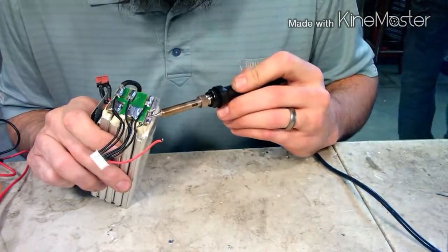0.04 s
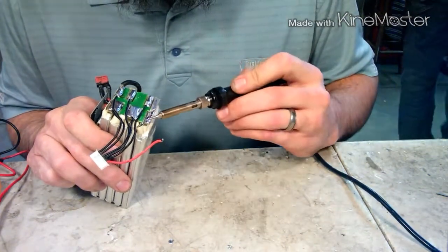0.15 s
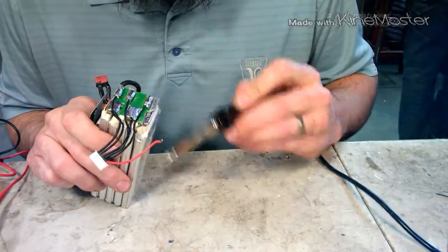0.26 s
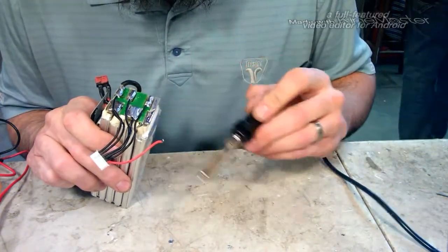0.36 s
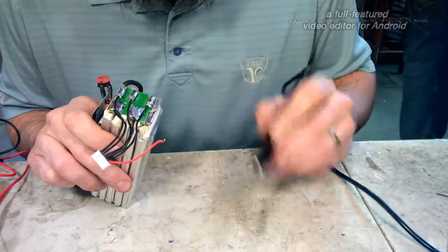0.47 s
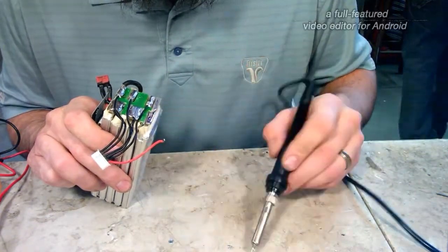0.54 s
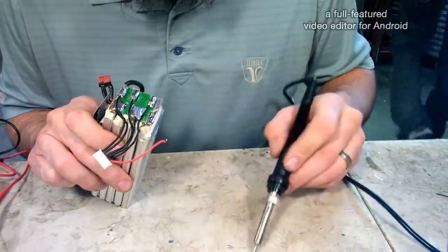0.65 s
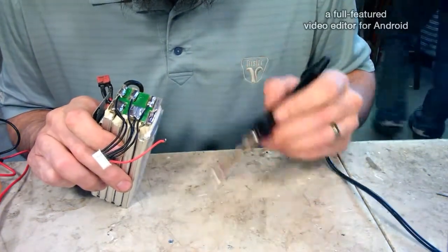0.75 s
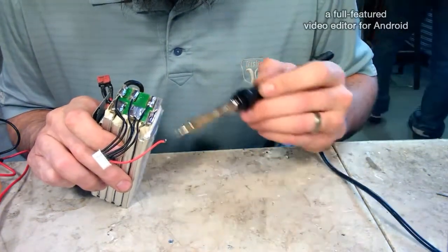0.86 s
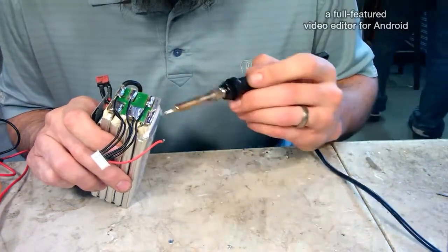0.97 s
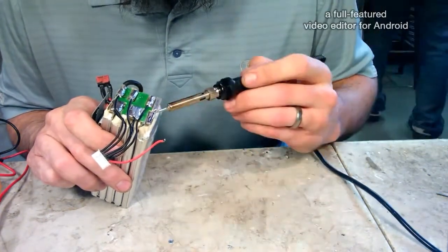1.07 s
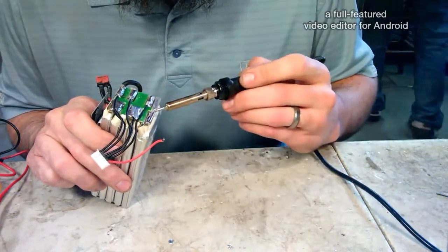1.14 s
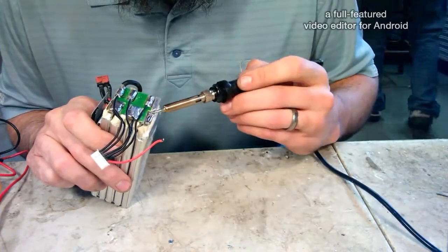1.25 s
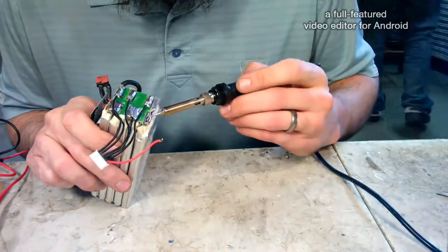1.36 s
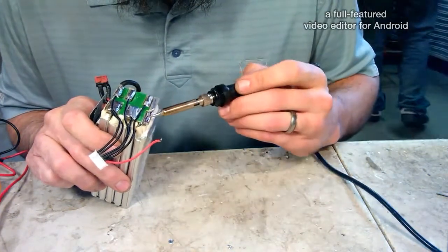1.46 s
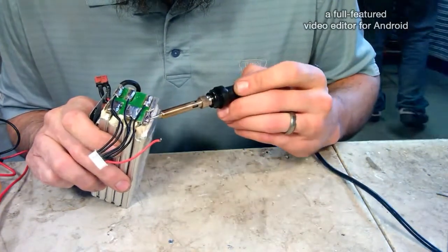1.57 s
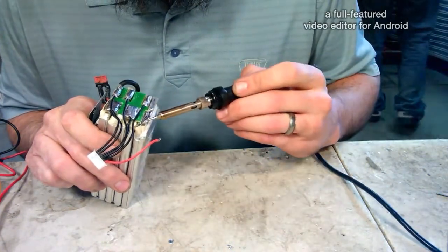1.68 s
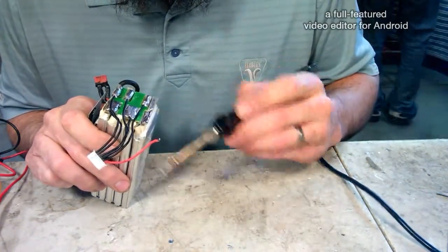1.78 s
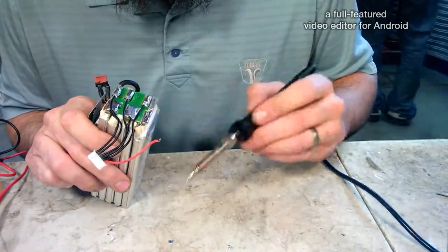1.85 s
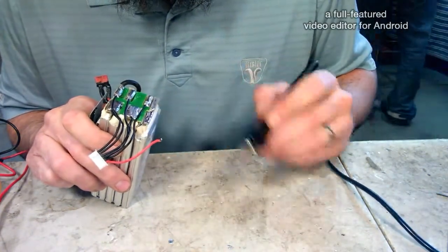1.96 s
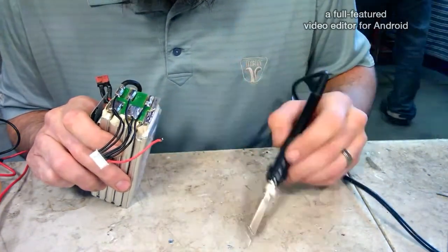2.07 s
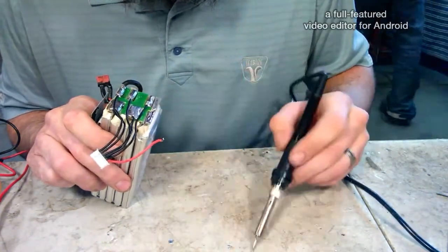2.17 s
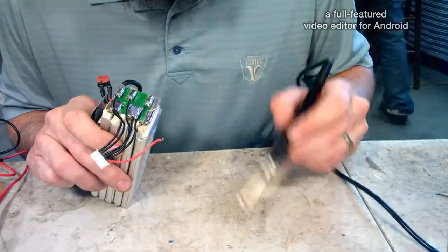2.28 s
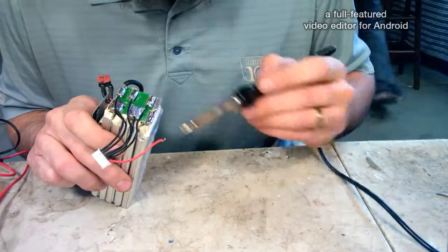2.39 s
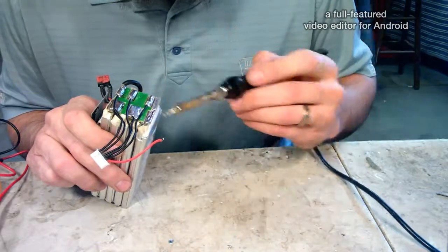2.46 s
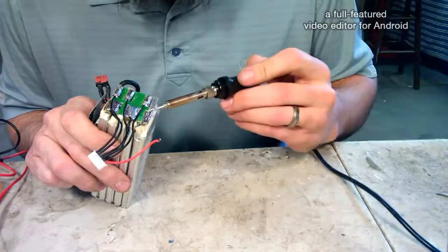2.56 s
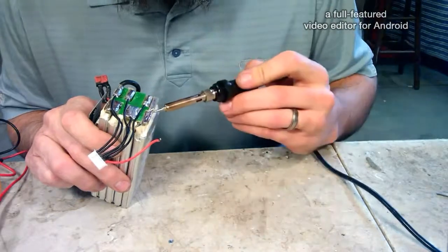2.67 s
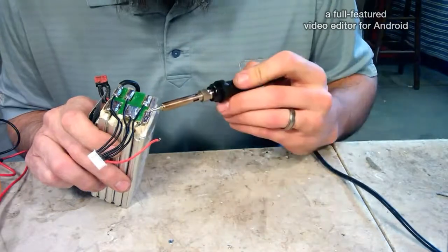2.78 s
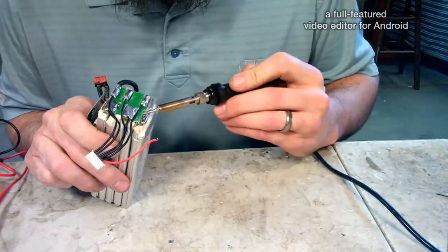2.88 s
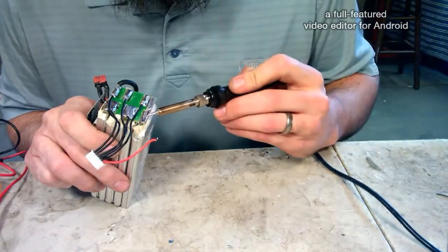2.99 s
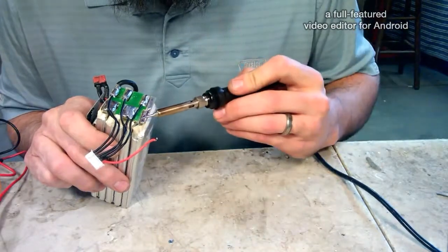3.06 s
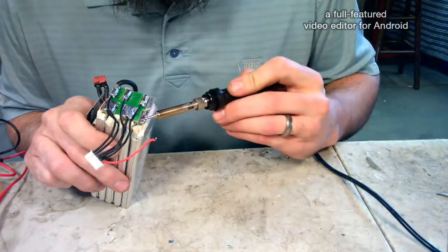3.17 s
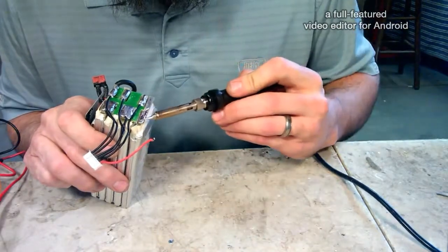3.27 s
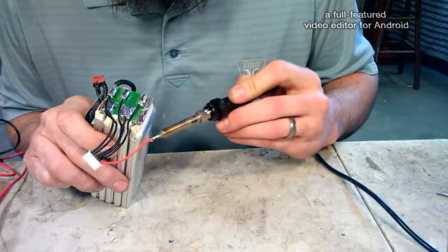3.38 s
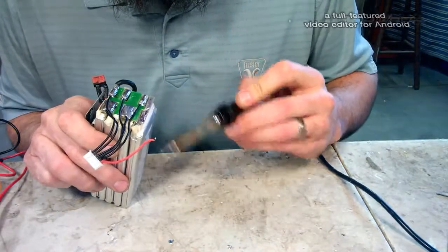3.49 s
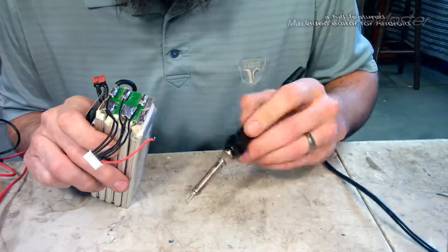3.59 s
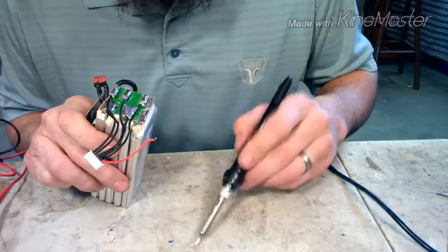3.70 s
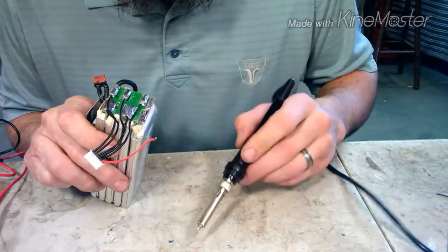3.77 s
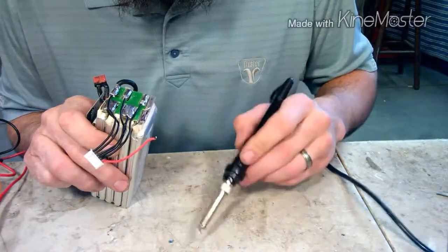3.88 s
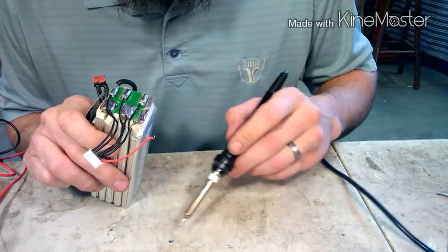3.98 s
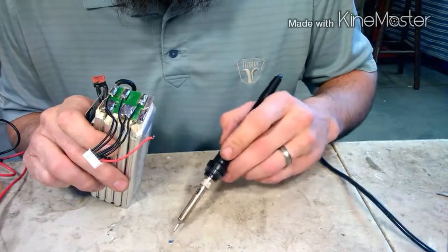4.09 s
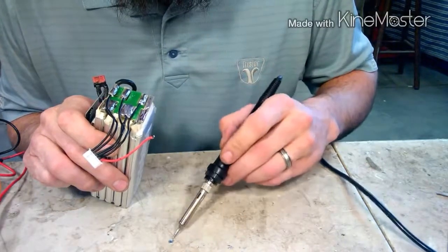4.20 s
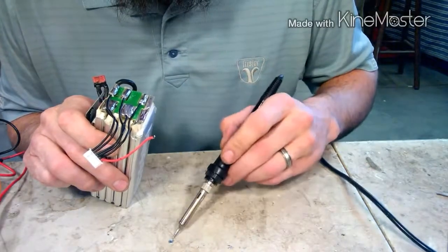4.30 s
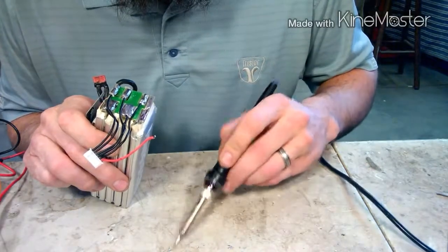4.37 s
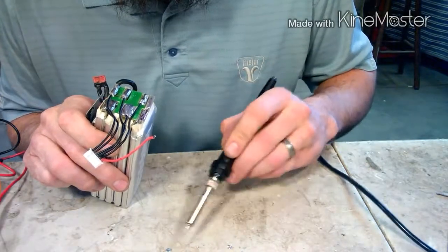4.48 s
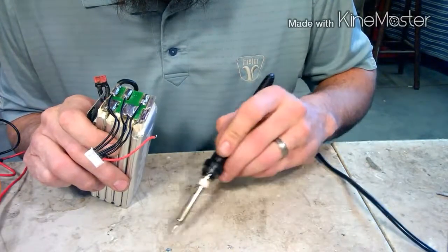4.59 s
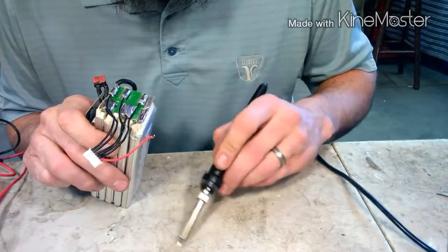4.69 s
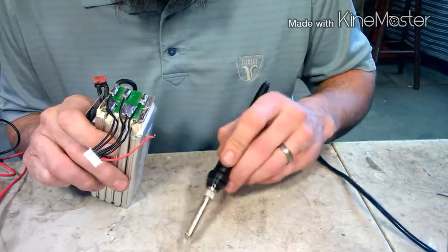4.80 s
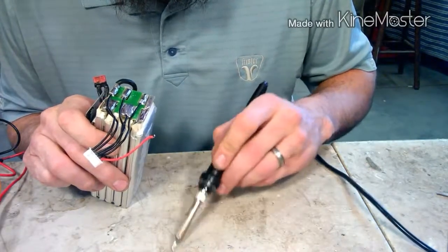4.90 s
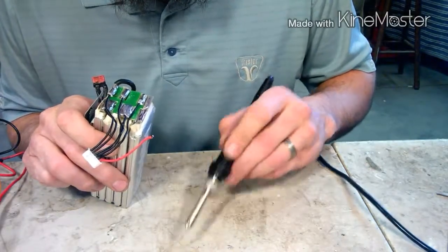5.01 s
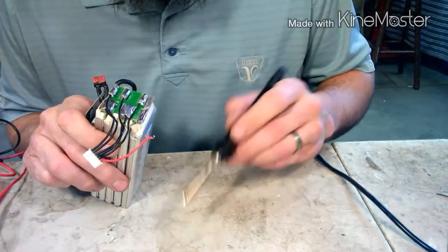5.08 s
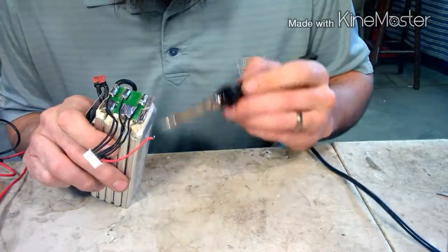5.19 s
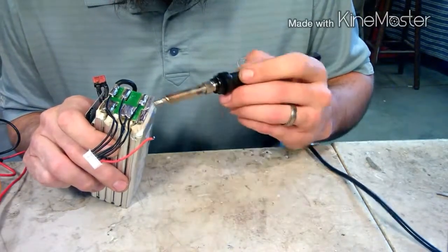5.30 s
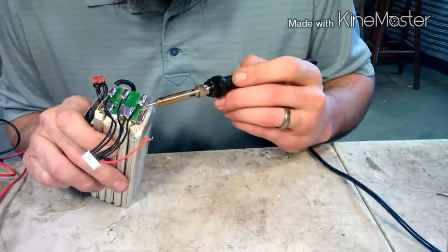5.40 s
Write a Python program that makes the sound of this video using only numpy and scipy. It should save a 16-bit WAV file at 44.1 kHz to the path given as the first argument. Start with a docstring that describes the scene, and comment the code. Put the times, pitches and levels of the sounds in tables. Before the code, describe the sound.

Hard dull knocks of a soldering iron on a workbench in three bursts, then faint taps and scrapes, over steady rumbling ventilation hiss.

```python
"""Soldering iron rapped on a workbench

A soldering iron is rapped on a workbench in three short bursts to shake off solder, then its tip is dabbed
and dragged on the top. Damped modes of the bench give dull knocks, filtered noise a crunch, and modes of the
steel barrel a tick; a drag is a run of small contacts. Filtered noise makes the ventilation rumble, hiss and
drone throughout; the camera's gain control ducks the sound after each hard rap and lets it swell back."""
import sys
import numpy as np
from scipy import signal
from scipy.fft import rfft, irfft, next_fast_len
from scipy.io import wavfile
from scipy.ndimage import uniform_filter1d, minimum_filter1d, map_coordinates

SR = 44100
rng = np.random.default_rng(int(sys.argv[2]) if len(sys.argv) > 2 else 0)


def materialize(psi):
    """Save the field psi as 16-bit PCM at rate SR to the path in sys.argv[1].

    A 1-D psi becomes a single channel; in a 2-D psi each row is a channel.
    """
    bounded = np.clip(np.atleast_2d(psi).T, -1, 1)
    quanta = np.round(bounded * 32767).astype(np.int16)
    wavfile.write(sys.argv[1], SR, quanta)


N = 240256

# Spectral density of the rushing air: (frequency [Hz], relative level [dB per Hz])
AIR_SPECTRUM = [(20, -15), (45, -14), (85, 1.5), (175, -1), (260, -4), (320, -2), (400, -7.5), (510, -8),
                (650, -12.5), (880, -12), (1200, -19), (2300, -26.5), (2620, -24), (3100, -27),
                (7000, -33.5), (15000, -45)]
# Level difference of the air, left over right: (frequency [Hz], difference [dB])
AIR_BALANCE = [(60, -10), (99, -5.5), (160, -6), (270, -12), (450, -1), (740, -5), (1210, -2), (2010, 0),
               (2450, -0.5), (2800, -2), (3310, -1), (5470, -0.5), (9030, -8.5), (14900, -9)]
# Correlation of the two sides before the lag and the notch: (frequency [Hz], correlation [0 to 1])
AIR_CORRELATION = [(40, 0.28), (150, 0.58), (300, 0.17), (460, 0.34), (650, 0.52), (1350, 0.97),
                   (1850, 0.19), (2400, 0.95), (2850, 0.85), (3400, 0.7), (5300, 0.57), (8000, 0.69),
                   (14000, 0.25)]
# Lag of the left microphone behind the right: (frequency [Hz], lag [s])
LEFT_LAG = [(1400, 0), (2630, .00019), (3700, .00027), (5100, .000294), (7900, .000316), (13800, .000326)]
# Brief dip of the background just before the second burst of raps: (time [s], level [dB])
BACKGROUND_DIP = [(1.975, 1), (1.995, -4), (2.04, -2.5), (2.08, 2)]
# Drone of the duct, before that dip: (time [s], level [dB])
DRONE_CURVE = [(0, -37), (.5, -44.5), (.9, -43), (1.15, -35.5), (1.5, -34.5), (1.85, -36), (2.2, -48.5),
               (5.45, -39)]
# Decay of the room: (frequency [Hz], t60 [s])
ROOM_DECAY = [(150, 0.37), (1500, 0.19), (10000, 0.53)]
# Modes of the bench top, nominal: (frequency [Hz], relative level [dB], t60 [s])
BENCH_MODES = [(175, 1, 0.012), (435.4, 2.5, 0.071), (591.5, 4.5, 0.031), (776, -2, 0.044),
               (911, -4, 0.028), (1045, -11.5, 0.026), (1208, -11, 0.089), (1335, -14.5, 0.044),
               (1528, -9.5, 0.042), (2010, -16.5, 0.0056), (2970, -32, 0.023)]
# Modes of the steel barrel, nominal: (frequency [Hz], relative level [dB], t60 [s])
BARREL_MODES = [(8730, 1, 0.026), (8900, -1, .02), (9400, -10, 0.016), (10700, -7, .015)]
# Spectral density of the crunch of a contact: (frequency [Hz], relative level [dB per Hz])
CRUNCH_SPECTRUM = [(40, -40), (150, 7), (450, 4.5), (900, 1), (1500, -6), (2200, -16), (2700, -17),
                   (3400, -11.5), (4200, -16), (5200, -27), (7500, -28.5), (9200, -27.5), (15000, -43)]
# Level difference of the bench, left over right: (frequency [Hz], difference [dB])
BENCH_BALANCE = [(60, -6), (130, -1), (290, -7), (640, 0), (1400, -1.5), (3080, 3), (6780, -3),
                 (14900, -19)]
# Raps, rebounds and taps: (time [s], level [dB], rise [s], thud [dB], body [dB], hollow [dB], rap [dB],
# clack [dB], hardness [dB], ring length [factor], pitch [factor])
CONTACTS = [ (0.4484, -5.5, 0.005, 3, -1.5, -3.5, 3.5, -5, -1.5, 0.74, 1.024),
            (0.469, -19, 0.0017, -1, 0, -5, -1, -4, -10, .6, 1),
            (0.517, -18.5, 0.0049, -11, 1.5, 0, 2, 0, -8, 1, 1.02),
            (1.968, -26, 0.003, -7, 0, 0, 0, -7, -15, .7, 1.01),
            (1.980, -29, 0.0018, -10, -2, 4, 2, -4, -13, 0.76, 0.97),
            (2.0432, -9.5, 0.0036, 1, -1, 5.5, -3, -0.5, 0, 0.45, 1),
            (2.1135, -10, 0.0055, 4, 1.5, 3.5, -4, -10, 0, 0.55, 1.01),
            (2.192, -17.5, 0.0042, 3, 1, 5.5, -1, -9, -7, 1, 1.03),
            (2.916, -29, 0.001, 0, -2, -1, 0, -2, -12, .45, 0.95),
            (3.659, -21, 0.0018, 2, -3, 5, 3, 5, 3, 0.36, 1),
            (3.6622, -8, 0.0035, 1, 3.5, 3, 0, 12.5, 6.5, 0.78, 1.01),
            (3.761, -15, 0.00099, 0, -0.5, 3.5, 1, 1.5, 4.5, 0.86, 1.01),
            (4.1074, -20, 0.0049, 6, 1, 2, -2, -7, -11, 0.83, 1),
            (4.322, -20.5, 0.0043, 4, 1, -1.5, 1.5, 1.5, -5, 0.74, 1.01),
            (4.349, -32, 0.004, 7, 1, -6, 0, -10, -12, 0.65, 1.03),
            (4.625, -27.5, 0.0027, 3, 0, -5, 1, -3, -14, 0.6, 0.98),
            (4.6633, -24.5, 0.001, 0, 0.5, -1, 10, 7, -13, 0.5, 0.96),
            (4.8615, -27, 0.001, 2, -1, -3, 2, 2, -13, 0.53, 1), ]
# The tip dragged over the top: (start [s], length [s], level [dB], thud [dB], clack [dB])
TIP_DRAGS = [(4.634, 0.026, -33.5, 3, -2), (4.67, 0.012, -36, 4, 7), (4.876, 0.024, -29, -2, 9)]

# Frequency weights of the colours of a contact, and of the wavering rumble: (frequency [Hz], weight [0 to 1])
THUD_WEIGHT = [(200, 1.0), (450, 0.097)]
BODY_WEIGHT = [(320, 0), (440, 1), (600, 1), (760, 0)]
HOLLOW_WEIGHT = [(620, 0.026), (800, 0.74), (1040, 1.0), (1190, 0.013)]
RAP_WEIGHT = [(1030, 0), (1190, 0.78), (1340, 1), (1520, 0.043)]
CLACK_WEIGHT = [(1330, 0.086), (1520, 0.91), (1800, 0.34), (2100, 0.46), (2700, 0.01)]
HARD_WEIGHT = [(1800, 0.12), (2900, 0.5), (6000, 0.91)]
RUMBLE_WEIGHT = [(250, 1), (600, 0.058)]

AIR_DB = -28  # level of the air before the brief dip
AIR_PATCHY_DB, RUMBLE_WAVER_DB = 1.29, -0.15  # rms depth of the patches; scale of the rumble's wavering
NOTCH_HZ, NOTCH_WIDTH_HZ, NOTCH_DB = 2630, 210, -11  # notch in what both sides share
KNOCK_GRIT_DB = -6.5  # crunch of a knock against the ring of the bench
TICK_DB, TICK_PER_HARD = -32.5, 1  # tick against the ring of the bench; dB added per dB of hardness
TICK_RISE_S = 0.0026  # the barrel takes a little longer to ring up
SLIP_S, SLIP_JITTER = .0045, .45  # median time between slips; its log-normal scatter
SLIP_RISE_S, SLIP_SCATTER_DB = 0.00093, 2  # attack of a slip; how much slips differ in level
SLIP_LENGTH, SLIP_HARD_DB, SLIP_GRIT_DB = 0.59, -11, -3.5  # a slip is short, soft and gritty
SLIP_BODY_DB, SLIP_HOLLOW_DB = -0.5, -2.5  # it stirs the low modes more than the middle ones
TOP_HZ = 15400  # upper band limit


def amp(db):
    """Level and amplitude: 20 dB is a factor of ten in gain."""
    return 10 ** (np.asarray(db) / 20)


def unit(x):
    """Normalisation: scale the mean power, and so the rms, to 1."""
    return x / np.sqrt(np.mean(x ** 2) + 1e-20)


def along(points, hz):
    """Logarithmic frequency: interpolate (frequency, value) points on a log axis."""
    f, v = np.transpose(points)
    return np.interp(np.log(hz + 1), np.log(f + 1), v)


def sides(points, hz):
    """Level difference of two channels: half goes to the left gain, minus half to the right."""
    return amp(np.multiply.outer([.5, -.5], along(points, hz)))


def filtered(x, response):
    """Linear filtering: multiply the spectrum of x by a response of frequency."""
    n = x.shape[-1]
    m = next_fast_len(n + 8192)  # padding limits wrap-around
    hz = np.fft.rfftfreq(m, 1 / SR)
    return irfft(rfft(x, m) * response(hz), m)[..., :n]


def wobble(rate):
    """Slow random modulation: a smooth curve through random knots, rate knots a second."""
    knots = rng.standard_normal(256)
    return map_coordinates(knots, [np.arange(N) * rate / SR], mode="wrap")


def add(out, s, sound):
    """Superposition: mix a sound in at time s."""
    out[:, round(s * SR):][:, :sound.shape[1]] += sound


def notched(pair):
    """Notch: sound common to both sides is weakened around 2630 Hz."""
    def notch(hz):
        return amp(NOTCH_DB * np.exp(-((hz - NOTCH_HZ) / NOTCH_WIDTH_HZ) ** 4))

    common = pair.mean(axis=0)
    return pair - common + filtered(common, notch)


def patchy(x):
    """Uneven noise: brief patches of random gain at all pitches and a wavering rumble."""
    hz, t, z = signal.stft(x, SR, nperseg=1024)
    patches = rng.standard_normal(z.shape[1:])
    patches = uniform_filter1d(patches, size=5, axis=0)
    patches = unit(uniform_filter1d(patches, size=4, axis=1))
    waver_curve = np.interp(t, np.arange(N) / SR, wobble(7))
    waver = np.outer(along(RUMBLE_WEIGHT, hz), waver_curve)
    gain = amp(AIR_PATCHY_DB * patches + RUMBLE_WAVER_DB * waver)
    return signal.istft(z * gain, SR, nperseg=1024)[1][:, :N]


def rushing_air():
    """Flow noise: partly correlated noise, louder on the right, its treble reaching that side first."""
    def mid_and_side(hz):
        # mixing angle that gives the wanted correlation of left and right
        turn = np.arccos(np.clip(along(AIR_CORRELATION, hz), 0, 1)) / 2
        return amp(along(AIR_SPECTRUM, hz)) * [np.cos(turn), np.sin(turn)]

    def lag_and_balance(hz):
        lag = np.exp(1j * np.pi * np.outer([-1, 1], hz * along(LEFT_LAG, hz)))
        return lag * sides(AIR_BALANCE, hz)

    mid, side = filtered(rng.standard_normal((2, N)), mid_and_side)
    pair = np.array([mid + side, mid - side])
    air = unit(filtered(pair, lag_and_balance))
    return unit(patchy(notched(air)))


def duct_drone():
    """Resonance: a duct passes a narrow band of noise around 176 Hz."""
    def duct(hz):
        return sides(AIR_BALANCE, hz) / (1 + ((hz - 176) / 15) ** 2)

    return unit(filtered(rng.standard_normal(N), duct))


def ventilation():
    """Superposed noise sources: broadband air of wavering level and the narrow drone of a duct."""
    t = np.arange(N) / SR
    air = amp(AIR_DB + 0.41 * wobble(6.05)) * rushing_air()
    drone = amp(np.interp(t, *np.transpose(DRONE_CURVE))) * duct_drone()
    dip = amp(np.interp(t, *np.transpose(BACKGROUND_DIP)))
    return dip * (air + drone)


def room(x):
    """Diffuse reverberation: the workshop answers with noise that decays at a rate set by frequency."""
    hz, t, z = signal.stft(rng.standard_normal((2, SR // 2)), SR, nperseg=256)
    decay = np.exp(-np.log(1000) * t / along(ROOM_DECAY, hz)[:, None])
    tail = signal.istft(z * decay, SR, nperseg=256)[1]
    late = np.pad(x, ((0, 0), (SR // 150, 0)))  # the answer starts 1/150 s late
    return signal.fftconvolve(late, tail / np.linalg.norm(tail[0]), axes=1)[:, :N]


def swell(t, rise, t60, dwell=0.0022):
    """Forced, then free vibration: builds up, holds while the tip chatters on the top, then dies away."""
    build_up = np.minimum(t / rise, 1)
    return build_up * np.exp(-np.log(1000) * np.maximum(t - rise - dwell, 0) / t60)


def ring(modes, t, rise, length, pitch, scatter_db, spread, detune):
    """Modal superposition: damped sines set off together, with slightly different phases on each side."""
    hz, db, t60 = np.transpose(modes)[:, :, None]
    sign = (-1) ** np.arange(len(hz))[:, None]
    size = amp(db + scatter_db * rng.standard_normal(hz.shape)) * sign
    hz = pitch * hz * (1 + detune * rng.standard_normal(hz.shape))
    phase = spread * rng.standard_normal((2, len(hz), 1))
    return size * swell(t, rise, t60 * length) * np.sin(2 * np.pi * hz * t + phase)


def touch(hz, thud_db, body_db, hollow_db, rap_db, clack_db, hardness_db):
    """Excitation: the hand's weight feeds the bass, the spot struck groups of modes, hardness the treble."""
    colour_db = thud_db * along(THUD_WEIGHT, hz)
    colour_db = colour_db + body_db * along(BODY_WEIGHT, hz)
    colour_db = colour_db + hollow_db * along(HOLLOW_WEIGHT, hz)
    colour_db = colour_db + rap_db * along(RAP_WEIGHT, hz)
    colour_db = colour_db + clack_db * along(CLACK_WEIGHT, hz)
    return amp(colour_db + hardness_db * along(HARD_WEIGHT, hz))


def knock(rise, thud_db, body_db, hollow_db, rap_db, clack_db, hardness_db, length, pitch, grit_db):
    """Impact: one contact excites the bench modes, a short noisy crunch and the tick of the barrel."""
    t = np.arange(SR // 8) / SR
    rise = max(rise, 1 / SR)

    def colour(hz):
        contact = touch(hz, thud_db, body_db, hollow_db, rap_db, clack_db, hardness_db)
        return contact * sides(BENCH_BALANCE, hz)

    def crunch_response(hz):
        return amp(along(CRUNCH_SPECTRUM, hz)) * colour(hz)

    modes = ring(BENCH_MODES, t, rise, length, pitch, scatter_db=2.7, spread=0.5, detune=0.01)
    mode_hz = np.array(BENCH_MODES)[:, :1]
    top = (modes * colour(mode_hz)).sum(1)

    # noise common to both sides plus some of each side's own
    grit = rng.standard_normal(len(t)) + 0.55 * rng.standard_normal((2, len(t)))
    crunch = filtered(grit, crunch_response) * swell(t, rise, 0.1 * length)

    barrel = ring(BARREL_MODES, t, rise + TICK_RISE_S, length, 1, scatter_db=4, spread=1.0, detune=0.0041)
    tick = barrel.sum(1) * amp([[-7], [0]])  # weaker on the left

    tick_db = TICK_DB + TICK_PER_HARD * hardness_db
    sound = unit(top) + amp(grit_db) * unit(crunch) + amp(tick_db) * unit(tick)
    return unit(sound) * np.sqrt(.02 * SR / len(t))  # the energy of 20 ms at rms 1


def slips(start, length, db, count=12):
    """Stick-slip friction: a dragged tip slips at uneven intervals; rows of (time [s], level [dB])."""
    gap, size = rng.standard_normal((2, count))
    gaps = SLIP_S * np.exp(SLIP_JITTER * gap)
    t = np.cumsum(gaps) - gaps[0]
    return np.column_stack([start + t, db + SLIP_SCATTER_DB * size])[t < length]


def iron():
    """Contact excitation: knocks are single impacts of the iron, drags are runs of small slips."""
    out = np.zeros((2, N + SR))
    for s, db, *contact in CONTACTS:
        add(out, s, amp(db) * knock(*contact, KNOCK_GRIT_DB))
    for start, length, drag_db, thud_db, clack_db in TIP_DRAGS:
        for s, db in slips(start, length, drag_db):
            slip = knock(SLIP_RISE_S, thud_db, SLIP_BODY_DB, SLIP_HOLLOW_DB, 0, clack_db, SLIP_HARD_DB,
                         SLIP_LENGTH, 0.98, SLIP_GRIT_DB)
            add(out, s, amp(db) * slip)
    return out[:, :N]


def scene():
    """Direct and diffuse sound: the iron close by, the room and its ventilation behind."""
    raps = iron()
    return raps + amp(-11.5) * room(raps) + ventilation()


def gain_control(x, limit_db, hold, slow_share, slow_db_per_s, fast_db_per_s):
    """Dynamic compression: loud sound cuts the gain at once; a little returns early, the rest after a hold."""
    t = np.arange(N) / SR

    def release(cut, rate):
        # the cut may fall no faster than rate [dB/s]
        return np.maximum.accumulate(cut + rate * t) - rate * t

    power = np.abs(uniform_filter1d(np.mean(x ** 2, 0), size=SR // 100))
    over = np.maximum(10 * np.log10(power + 1e-12) - limit_db, 0)
    span = max(int(hold * SR), 1)
    held = -minimum_filter1d(-over, span, origin=(span - 1) // 2)  # running maximum
    fast_cut = release(over, fast_db_per_s)
    slow_cut = release(slow_share * held, slow_db_per_s)
    cut_db = np.maximum(fast_cut, slow_cut)
    return x * amp(-uniform_filter1d(cut_db, size=SR // 500))


def record(dry):
    """Compression and band limiting: the camera's gain control, then a sharp upper cutoff."""
    levelled = gain_control(dry, limit_db=-14.0, hold=0.037, slow_share=0.9, slow_db_per_s=14.5,
                            fast_db_per_s=25)
    return filtered(levelled, lambda hz: hz < TOP_HZ)


dry = scene()
out = record(dry)
materialize(out)
```